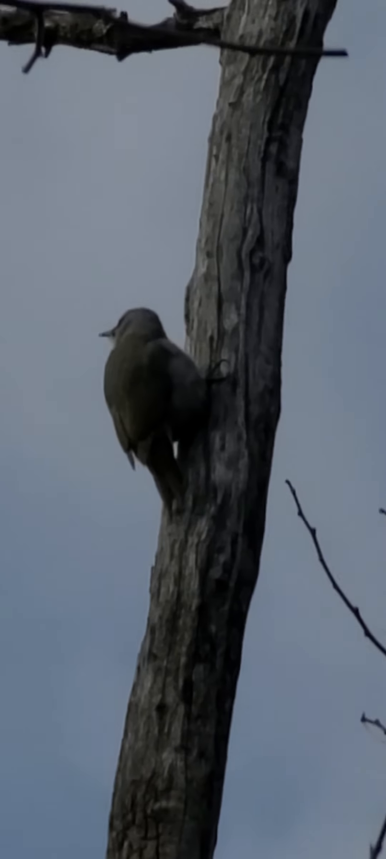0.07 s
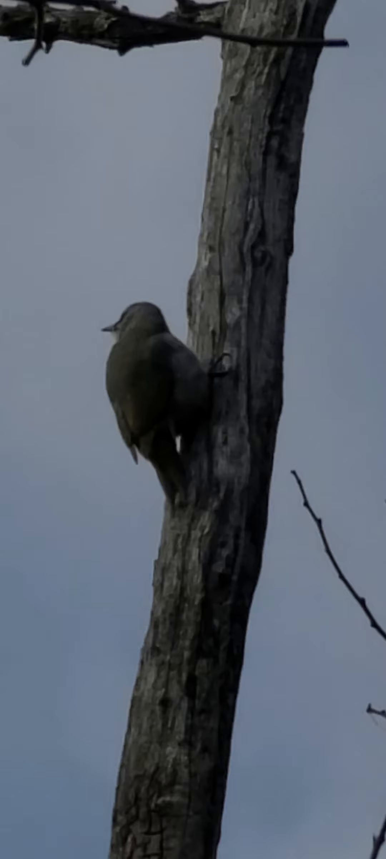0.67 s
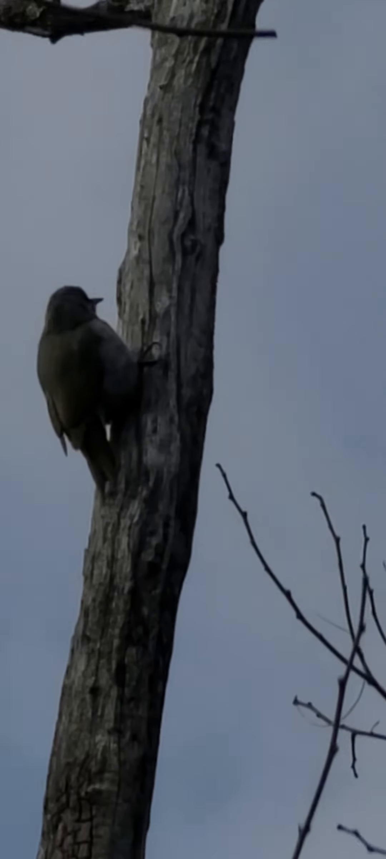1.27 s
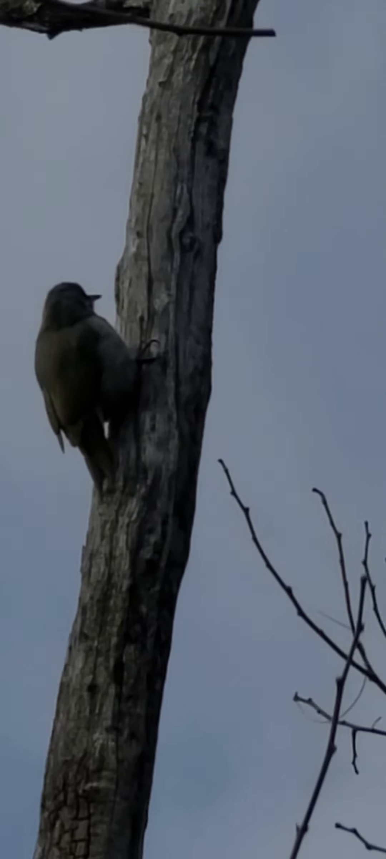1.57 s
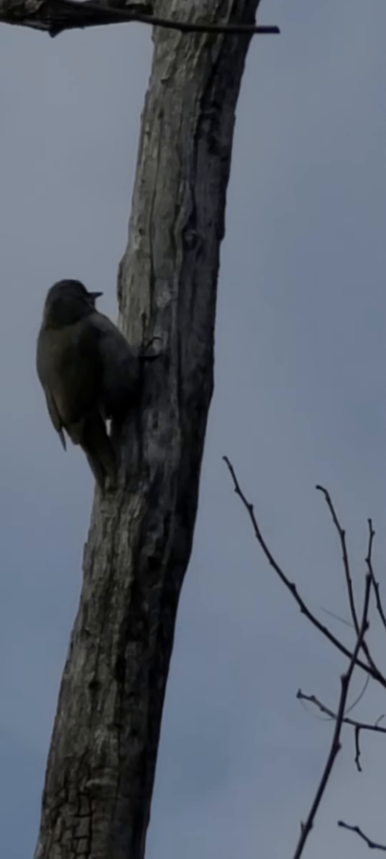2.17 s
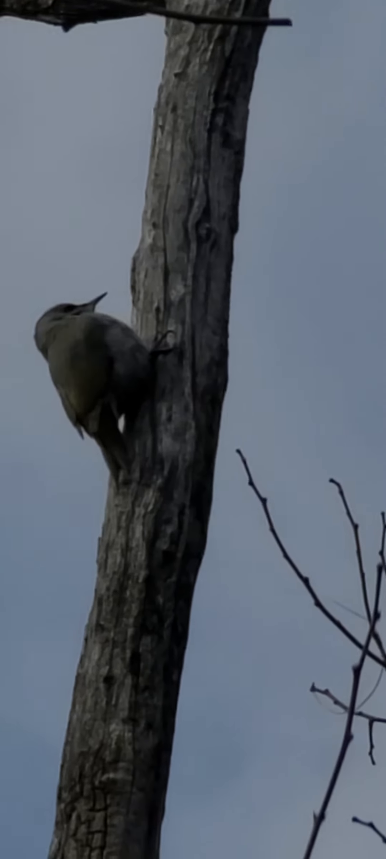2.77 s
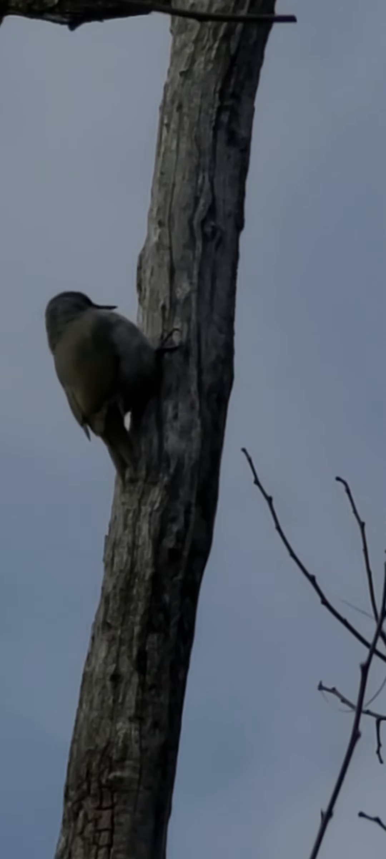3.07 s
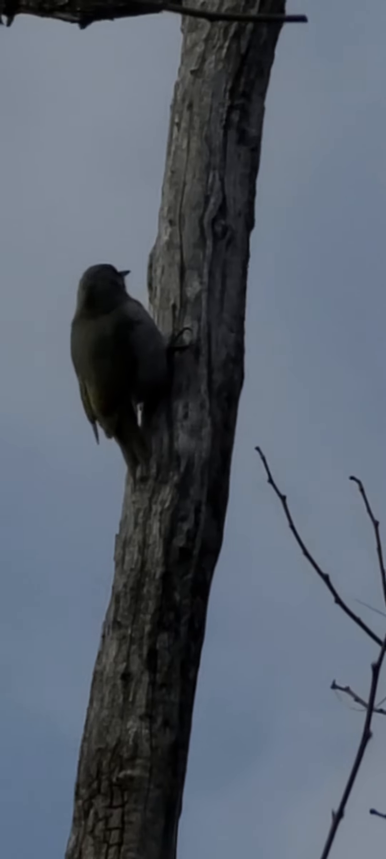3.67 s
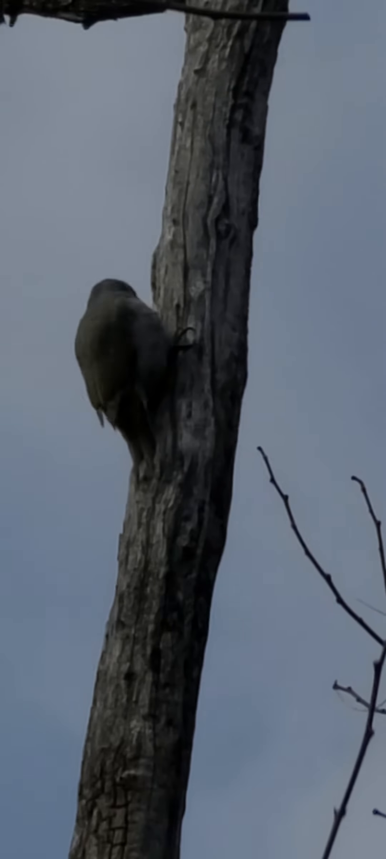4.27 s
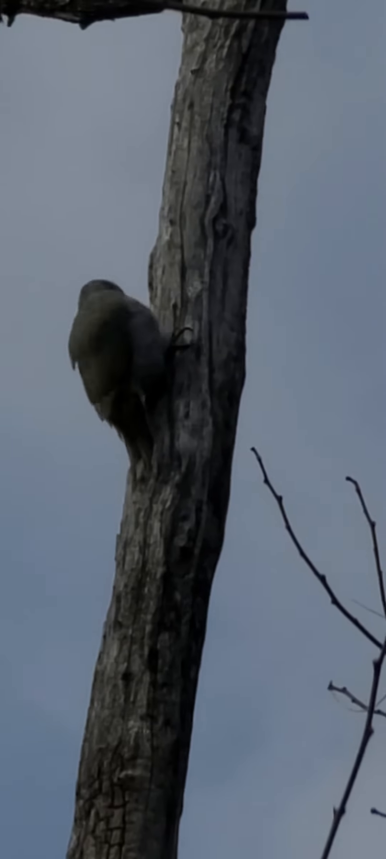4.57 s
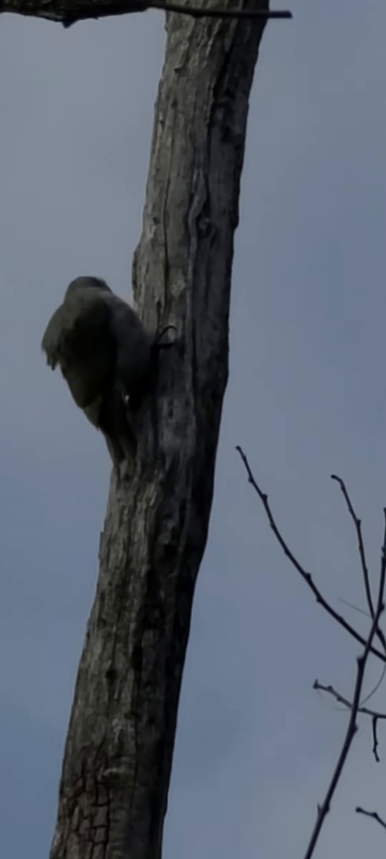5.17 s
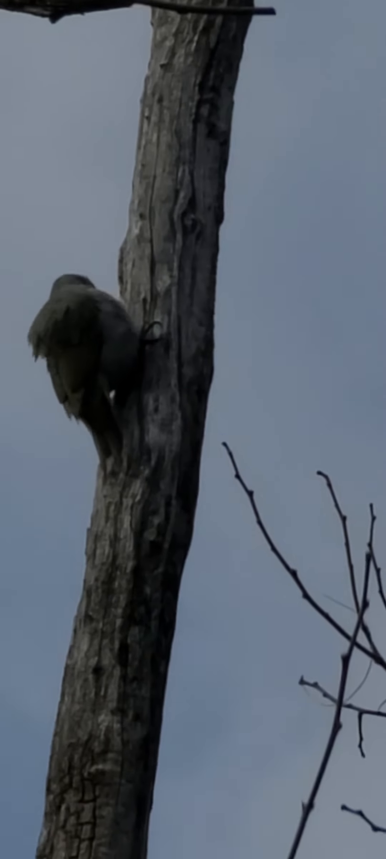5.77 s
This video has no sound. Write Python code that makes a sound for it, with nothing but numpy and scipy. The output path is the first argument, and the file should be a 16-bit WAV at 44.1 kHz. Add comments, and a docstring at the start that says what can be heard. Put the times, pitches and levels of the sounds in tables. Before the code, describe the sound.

In a quiet forest, a low distant rumble and soft air run throughout, with light puffs of wind and a faint hiss on the microphone. Far birds give a few faint, short whistles. After about four seconds a nearby woodpecker drums one very fast roll on a hollow dead trunk. The dry, ringing knocks swell, slow slightly and fade with a short echo.

```python
"""Woodpecker on a hollow trunk.

One fast roll of 32 bill blows on dead wood swells, slows slightly and fades. Each blow rings the
same modes, with a dry crack and a dull thump; a few snap off splinters. Trees scatter the sound back.
Behind it: distant rumble, forest air, wind puffs and hiss in the microphone, far birds, one rustle."""
import sys
import numpy as np
from scipy import signal
from scipy.fft import rfft, irfft, next_fast_len
from scipy.io import wavfile
from scipy.ndimage import map_coordinates

SR = 44100
rng = np.random.default_rng(int(sys.argv[2]) if len(sys.argv) > 2 else 0)


def dump_mix(stems):
    """Bounce the given channels to the path in sys.argv[1] as a 16-bit WAV at rate SR."""
    frames = np.atleast_2d(stems).T  # one column per channel
    limited = np.clip(frames, -1, 1)  # hard clip at full scale
    pcm = np.round(limited * 32767).astype(np.int16)
    wavfile.write(sys.argv[1], SR, pcm)


N = 264776

# distant rumble: freq_hz, density_db
RUMBLE_SPECTRUM = [(15, -19.5), (35, -8), (56, 2.5), (75, -7.5), (100, -10), (140, -18.5), (300, -34.5),
                   (900, -77.5)]
# air in the trees: freq_hz, density_db
AIR_SPECTRUM = [(60, -72.5), (170, -2.5), (290, 2.5), (480, -3.5), (780, -1.5), (1100, -9), (1600, -16.5),
                (2200, -24), (3200, -25), (4500, -31.5), (9000, -35.5), (15000, -50.5)]
# left-right likeness of the air: freq_hz, correlation
AIR_CORRELATION = [(100, 1), (400, 0.87), (900, 0.55), (2000, 0.1), (5000, 0.081)]
# microphone self-noise: freq_hz, density_db
HISS_SPECTRUM = [(2000, -7.5), (6300, 2), (8600, -7), (10800, 3.5), (12300, 7), (13500, 3), (15500, -6.5)]
# wind puffs on the microphone ports: peak_s, half_width_s, left_db, right_db
WIND_PUFFS = [(0.194, 0.018, -43, -29), (0.997, 0.085, -56, -37), (1.195, 0.024, -58, -31),
              (1.276, 0.038, -55, -26.5), (1.679, 0.057, -50, -33.5), (2.222, 0.033, -57, -34),
              (2.618, 0.027, -38, -58), (3.427, 0.048, -58, -32.5), (5.308, 0.52, -47.5, -47)]
# wind buffeting: freq_hz, density_db
WIND_SPECTRUM = [(15, -14.5), (30, 6.5), (50, 6.5), (75, -7), (110, -29.5), (200, -22), (600, -78.5)]
# far whistles: start_s, length_s, start_hz, middle_hz, end_hz, level_db
BIRD_CHIRPS = [(.635, 0.1, 3660, 3870, 3600, -71), (0.944, 0.072, 1790, 1782, 1880, -63),
               (1.01, .09, 2250, 2320, 2340, -75), (1.098, 0.098, 1966, 1990, 2050, -71),
               (1.619, .12, 1267, 1430, 1276, -58.5), (1.728, .08, 1616, 1530, 1430, -67),
               (1.922, 0.063, 3200, 3260, 3240, -75), (2.26, .1, 1440, 1530, 1320, -59),
               (2.75, .07, 3580, 3450, 3250, -79), (3.523, 0.069, 1620, 1590, 1460, -69)]
# forest echo decay: freq_hz, t60_s
ECHO_DECAY = [(300, 0.45), (800, 0.26), (1600, 0.37), (3000, 0.38), (9000, 0.26)]
# forest echo colour: freq_hz, gain_db
ECHO_COLOUR = [(400, 4), (680, 2), (850, -0.5), (1300, -4.5), (2000, 7.5), (3000, 2), (5000, 0.5),
               (9000, -3.5)]
# rustle in the trees: freq_hz, density_db
RUSTLE_SPECTRUM = [(1500, -8.5), (2500, 3), (4000, -4.5), (5600, 0.5), (7500, -8), (11000, -19.5)]
# hollow trunk modes: freq_hz, level_db, t60_s, left_minus_right_db
TRUNK_MODES = [(384.2, -20, 0.16, -1.5), (626, -35, 0.029, -2.5), (654, -14.5, 0.052, -5.5),
               (800.3, 12, 0.021, 1.5), (902, -5.5, 0.089, -1), (998, -11.5, 0.026, -10),
               (1250.7, -0.5, 0.03, 1.5), (1540, -21, 0.011, 1.5), (1591.6, -21, 0.084, -1.5),
               (1763, -22.5, 0.05, -1), (1840, -17, 0.044, 3), (2152, -30.5, 0.06, 4.5),
               (2425, -32.5, 0.048, 2.5), (2894, -23.5, 0.033, -3), (3100, -29.5, 0.066, 2),
               (3273, -29, .026, -3.5), (3600, -38.5, .018, -4.5), (3840, -37.5, 0.033, 1),
               (4030, -41, 0.045, 0), (4270, -47, 0.055, -2.5), (4940, -44.5, .028, -4),
               (5340, -46.5, .018, -0.5)]
# bill contact crack: freq_hz, density_db
CRACK_SPECTRUM = [(800, -8.5), (1800, -2.5), (3000, 4.5), (3700, -11.5), (4500, -16), (5200, -13.5),
                  (6000, -20), (7000, -25), (9000, -32), (15000, -40.5)]
# early sound from lower on the trunk, as waves in wood outrun air: lead_s, level_db
TRUNK_FORERUNNERS = [(.003, -6), (.0068, -18)]
# uneven radiation toward the two ports: freq_hz, left_lead_rad
PORT_PHASE = [(450, 0.22), (680, 0.68), (800, 0.29), (870, -1.3), (960, -1.83), (1300, -1.77),
              (1600, -0.71), (2100, 0.26), (5000, -0.76)]
# whole-trunk thump: freq_hz, density_db
THUMP_SPECTRUM = [(60, -13.5), (140, -3), (200, -3.5), (300, -0.5), (450, -8), (700, -29.5), (1500, -58.5)]
# dry wood snapping under the bill: start_s, level_db
SPLINTER_SNAPS = [(4.6546, -35.5), (5.4416, -55.5), (5.497, -56.5)]
# one snap: freq_hz, density_db
SPLINTER_SPECTRUM = [(2000, -16), (3200, 3), (5000, -2), (6800, -12.5), (8100, 2), (9500, -13.5),
                     (12500, -20), (15000, -10)]


def amp(db):
    """Decibels to gain."""
    return 10 ** (np.asarray(db) / 20)


def unit_rms(x):
    """Scale to rms 1."""
    return x / np.sqrt(np.mean(x ** 2) + 1e-20)


def curve_at(points, hz):
    """Interpolate (freq_hz, value) rows on a log frequency axis."""
    knots_hz, values = np.transpose(points)
    return np.interp(np.log(hz + 1), np.log(knots_hz + 1), values)


def filtered(x, response):
    """Apply response(hz) by FFT."""
    size = x.shape[-1]
    padded = next_fast_len(size + 8192)
    return irfft(rfft(x, padded) * response(np.fft.rfftfreq(padded, 1 / SR)), padded)[..., :size]


def noise(spectrum, size):
    """Two independent coloured noises, rms 1."""
    return unit_rms(filtered(rng.standard_normal((2, size)), lambda hz: amp(curve_at(spectrum, hz))))


def ambience(spectrum, correlation):
    """Stereo noise with a set left-right correlation, rms 1."""
    def mid_side_gains(hz):
        angle_rad = np.arccos(np.clip(curve_at(correlation, hz), -1, 1)) / 2
        return np.array([np.cos(angle_rad), np.sin(angle_rad)])
    mid, side = filtered(noise(spectrum, N), mid_side_gains)
    return unit_rms(np.array([mid + side, mid - side]))


def decay(t, t60_s):
    """Exponential decay, 60 dB down at t60_s."""
    return np.exp(-np.log(1000) * t / t60_s)


def add(track, start_s, sound):
    """Mix a sound into a stereo track."""
    span = track[:, round(start_s * SR):][:, :sound.shape[-1]]
    span += sound[..., :span.shape[1]]


def background(rumble_db=-49, air_db=-55, hiss_left_db=-73, hiss_right_db=-79):
    """Steady distant rumble, air in the trees and microphone self-noise."""
    rumble = amp(rumble_db) * ambience(RUMBLE_SPECTRUM, correlation=[(60, 1.0)])
    air = amp(air_db) * ambience(AIR_SPECTRUM, AIR_CORRELATION)
    hiss = amp([[hiss_left_db], [hiss_right_db]]) * noise(HISS_SPECTRUM, N)
    return rumble + air + hiss


def wind(left_db=-57, right_db=-46):
    """A light breeze buffets the ports, mostly the right, and swells in puffs."""
    t = np.arange(N) / SR
    envelope = amp([[left_db], [right_db]])
    for peak_s, half_width_s, puff_left_db, puff_right_db in WIND_PUFFS:
        puff = np.exp(-((t - peak_s) / half_width_s) ** 2)
        envelope = np.hypot(envelope, amp([[puff_left_db], [puff_right_db]]) * puff)
    return envelope * noise(WIND_SPECTRUM, N)


def far_birds(waver_depth=0.013, waver_hz=160):
    """Short gliding, slightly wavering whistles from deep in the wood."""
    song = np.zeros((2, N))
    for start_s, length_s, start_hz, middle_hz, end_hz, level_db in BIRD_CHIRPS:
        progress = np.linspace(0, 1, round(length_s * SR))
        glide_hz = np.polyval(np.polyfit([0, 0.5, 1], [start_hz, middle_hz, end_hz], 2), progress)
        waver = map_coordinates(rng.standard_normal(64), [progress * length_s * waver_hz])
        pitch_hz = glide_hz * (1 + waver_depth * waver)
        envelope = amp(level_db) * np.sin(np.pi * progress)
        add(song, start_s, envelope * np.sin(2 * np.pi * np.cumsum(pitch_hz) / SR))
    return song


def forest_echo(source, rise_s=0.012):
    """Trunks and ground scatter a short diffuse echo, different at each port."""
    hz, t, bands = signal.stft(rng.standard_normal((2, SR * 3 // 4)), SR, nperseg=256)
    envelope = decay(t, curve_at(ECHO_DECAY, hz)[:, None]) * (1 - np.exp(-t / rise_s))
    _, tail = signal.istft(bands * envelope, SR, nperseg=256)
    tail = filtered(tail / np.linalg.norm(tail[0]), lambda hz: amp(curve_at(ECHO_COLOUR, hz)))
    return signal.fftconvolve(source, tail, axes=1)[:, :N]


def rustle(peak_s=1.13, half_width_s=0.1, level_db=-72):
    """Something dry stirs briefly in the trees."""
    t = np.arange(N) / SR
    envelope = np.exp(-((t - peak_s) / half_width_s) ** 2)
    return amp(level_db) * envelope * noise(RUSTLE_SPECTRUM, N)


def bill_blows(start_s=4.2448, end_s=5.8742, count=32, slowing=0.0726, jitter_s=0.0003,
               soft_start_db=-5, swell_s=0.6, release_db=-7, release_s=0.28, wind_up_db=2.5,
               treble_db=-1.5, graze_db=-25.5, graze_s=0.032,
               force_scatter_db=0.4, hardness_scatter_db=0.55):
    """One roll, slowing as the bird tires. Rows: start_s, level_db, hardness_db."""
    gaps = 1 + slowing * np.linspace(0, 1, count - 1, endpoint=False) ** 2
    elapsed_s = (end_s - start_s) * np.append(0, np.cumsum(gaps)) / gaps.sum()
    remaining_s = elapsed_s[-1] - elapsed_s
    timing, force, bite = rng.standard_normal((count, 3)).T
    swell_db = soft_start_db * np.maximum(1 - elapsed_s / swell_s, 0)
    fade_db = release_db * np.maximum(1 - remaining_s / release_s, 0) ** 2
    level_db = swell_db + fade_db + force_scatter_db * force
    level_db[0] += wind_up_db
    dulling_db = graze_db * np.exp(-remaining_s / graze_s)  # last blows barely bite
    hardness_db = treble_db + dulling_db + hardness_scatter_db * bite
    return np.column_stack([start_s + elapsed_s + jitter_s * timing, level_db, hardness_db])


def drumming(blows, ring_db=-15, attack_cycles=0.35, scatter_db=0.7, treble_from_hz=1300,
             crack_db=-40, crack_t60_s=0.032, crack_rise_s=0.00021):
    """Blows on one spot crack and ring the same modes; harder contact adds treble."""
    t = np.arange(SR // 5) / SR
    freq_hz, mode_db, t60_s, pan_db = np.transpose(TRUNK_MODES)
    cycles = freq_hz[:, None] * t
    polarity = (-1) ** np.arange(len(freq_hz))[:, None]  # adjacent modes swing opposite ways
    attack = (1 - np.exp(-cycles / attack_cycles)) ** 2
    modes = polarity * np.sin(2 * np.pi * cycles) * decay(t, t60_s[:, None]) * attack
    port_gains = amp(np.array([pan_db, -pan_db]) / 2)
    treble_share = np.clip(np.log2(freq_hz / treble_from_hz), 0, 1)
    crack_envelope = decay(t, crack_t60_s) * (1 - np.exp(-t / crack_rise_s))
    wood = np.zeros((2, N))
    for start_s, level_db, hardness_db in blows:
        chance_db = scatter_db * rng.standard_normal(len(freq_hz))
        mode_gains = amp(ring_db + mode_db + hardness_db * treble_share + chance_db)
        ring = (port_gains * mode_gains) @ modes
        crack = amp(crack_db + hardness_db) * crack_envelope * noise(CRACK_SPECTRUM, len(t))
        add(wood, start_s, amp(level_db) * (ring + crack))
    return wood


def trunk_radiation(wood, highpass_hz=580, forerunner_cutoff_hz=1700,
                    return_db=-8.5, return_s=0.0062, return_cutoff_hz=1600):
    """The slim trunk radiates little bass; dull forerunners lead, a reflection from its end trails."""
    def response(hz):
        early = sum(amp(db) * np.exp(2j * np.pi * hz * lead_s) for lead_s, db in TRUNK_FORERUNNERS)
        early /= 1 + (hz / forerunner_cutoff_hz) ** 4
        late = amp(return_db) * np.exp(-2j * np.pi * hz * return_s)
        late /= 1 + (hz / return_cutoff_hz) ** 4
        port_shift = np.exp(0.5j * np.outer([1, -1], curve_at(PORT_PHASE, hz)))
        return (1 + early + late) * port_shift
    highpass = signal.butter(3, highpass_hz, "high", fs=SR, output="sos")
    return filtered(signal.sosfilt(highpass, wood), response)


def thumps(blows, gain_db=-48, t60_s=0.15, rise_s=0.002):
    """Each blow shakes the whole trunk, far below its ring."""
    t = np.arange(SR // 4) / SR
    envelope = decay(t, t60_s) * np.minimum(t / rise_s, 1)
    track = np.zeros((2, N))
    for start_s, level_db, _ in blows:
        add(track, start_s, amp(gain_db + level_db) * envelope * noise(THUMP_SPECTRUM, len(t))[0])
    return track


def splinters(t60_s=0.0071):
    """Tiny bright snaps as the dry surface gives way."""
    t = np.arange(SR // 20) / SR
    snaps = np.zeros((2, N))
    for start_s, level_db in SPLINTER_SNAPS:
        add(snaps, start_s, amp(level_db) * decay(t, t60_s) * noise(SPLINTER_SPECTRUM, len(t)))
    return snaps


def scene(roll_send_db=-8, snap_send_db=-10, bird_send_db=-7):
    """Near woodpecker and far birds share one forest echo."""
    blows = bill_blows()
    roll = trunk_radiation(drumming(blows)) + thumps(blows)
    snaps = splinters()
    birds = far_birds()
    echo = forest_echo(amp(roll_send_db) * roll + amp(snap_send_db) * snaps + amp(bird_send_db) * birds)
    return roll + snaps + birds + echo + rustle() + wind() + background()


def record(dry, cutoff_hz=15720):
    """Camera band limit: brick-wall low-pass."""
    return filtered(dry, lambda hz: hz < cutoff_hz)


dry = scene()
out = record(dry)
dump_mix(out)
```